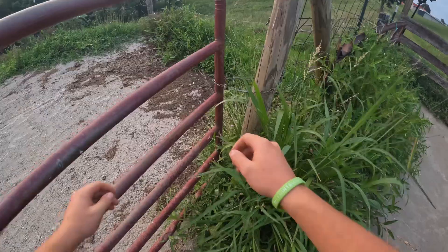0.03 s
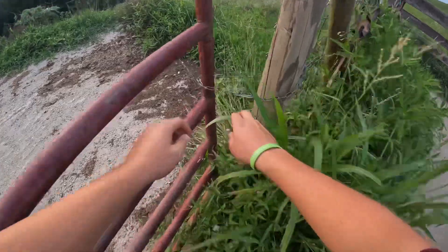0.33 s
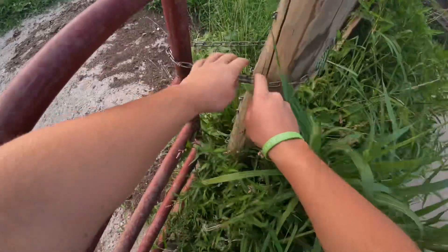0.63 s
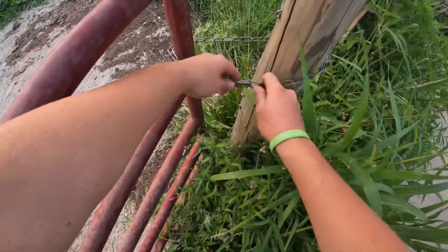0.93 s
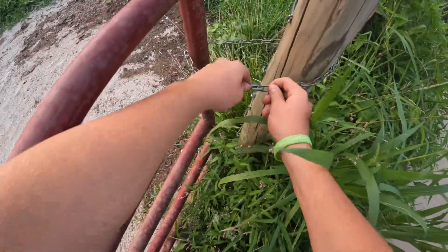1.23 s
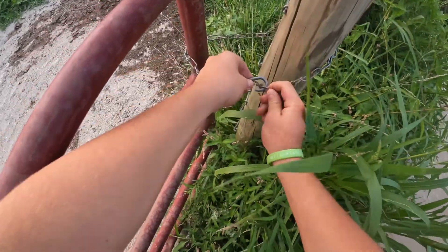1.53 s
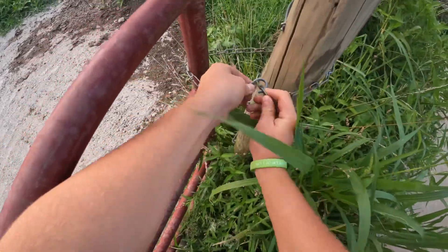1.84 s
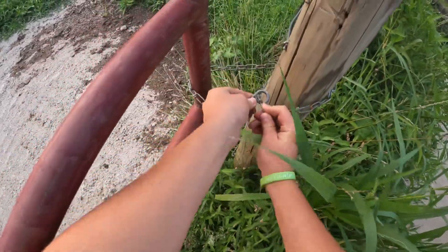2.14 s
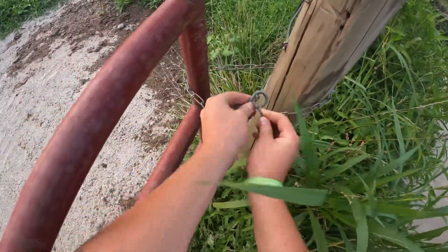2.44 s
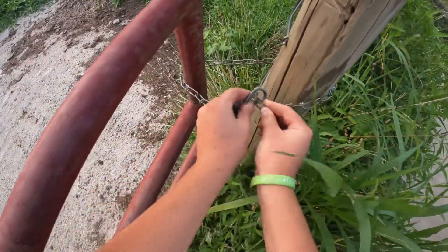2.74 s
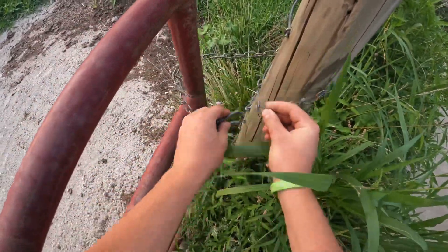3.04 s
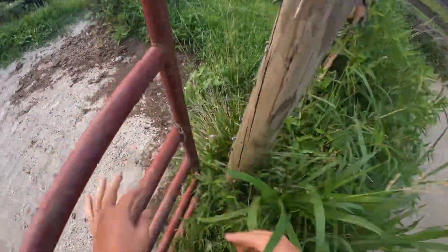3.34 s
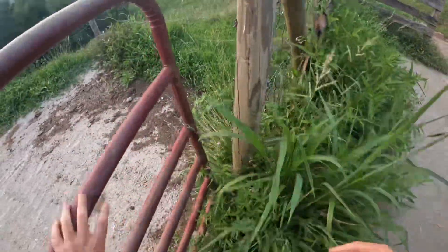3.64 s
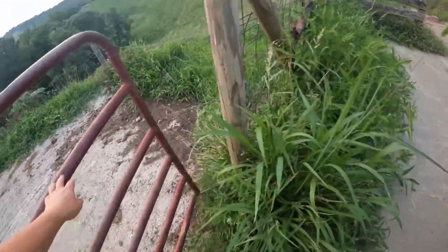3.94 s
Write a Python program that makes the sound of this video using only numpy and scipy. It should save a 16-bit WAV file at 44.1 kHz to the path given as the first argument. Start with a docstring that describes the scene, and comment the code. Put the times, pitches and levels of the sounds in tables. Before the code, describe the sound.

A chain is unhooked and rattles against a steel gate outdoors, while a small engine idles close by throughout with quick thumps and light clatter. Grass rustles softly around 0.4 seconds. A snap latch clacks at 1.3 seconds, followed by faint ticks of links. The chain clatters on the ringing tubes at 3.3 seconds and again at 3.8, when the gate also bumps dully in its hinges.

```python
"""Outdoors, a single-cylinder engine idles close by, about eleven exhaust thumps a second with the
valve gear clattering in step. Early on, arms brush through long grass. At 1.3 s a snap latch clacks,
then links tick in the fingers as a chain is unhooked from a steel tube gate. From 3.3 s the loose chain
drops and rattles against the ringing tubes in two bursts; under the second, the swinging gate bumps
in its hinges."""
import sys
import numpy as np
from scipy import signal
from scipy.fft import rfft, irfft
from scipy.io import wavfile

SR = 44100
rng = np.random.default_rng(int(sys.argv[2]) if len(sys.argv) > 2 else 0)


def inscribe(sig):
    """Save sig as 16-bit PCM at rate SR to the path in sys.argv[1].

    A 1-D sig is mono; a 2-D sig holds one channel per row.
    Samples are clipped to [-1, 1] before scaling.
    """
    pcm = np.round(np.clip(np.atleast_2d(sig).T, -1, 1) * 32767)
    wavfile.write(sys.argv[1], SR, pcm.astype(np.int16))


N = 176400

# The chain strikes the gate. Each row: start in seconds, level in dB, treble tilt in dB per octave,
# rattle decay in seconds, rattle level in dB against the blow.
CHAIN_HITS = [(3.259, -39.5, -1.5, 0.018, 5.5), (3.2763, -21.5, 3.5, 0.021, -5),
              (3.2823, -28, 0.5, 0.013, 0), (3.3027, -21.5, 2.5, 0.026, -0.5),
              (3.3267, -24, -0.5, .025, -27), (3.345, -29, -3, 0.035, -0.5),
              (3.412, -31.5, 14.5, .008, -12), (3.4214, -19.5, -1, 0.0041, -6),
              (3.447, -26, -2.5, 0.014, -3.5), (3.495, -30, -6, 0.017, -5), (3.7622, -43, -6.5, 0.056, 6.5),
              (3.82, -32.5, 2.5, .008, -11), (3.8255, -30, -8.5, 0.0032, -6), (3.8345, -29, 1, 0.017, -2.5),
              (3.8659, -21, .5, 0.024, -11), (3.885, -34, 8, .02, 2), (3.909, -25, -3, 0.043, -3),
              (3.9557, -27.5, 7, 0.01, -10)]
# Tone of the struck gate. Each row: frequency in Hz, relative level in dB.
GATE_TONE = [(210, -1), (350, -20), (481, -5.5), (692, -16), (749, -6.5), (951, -9.5), (1190, -4.5),
             (1460, -5.5), (2170, -2), (2580, -1), (3840, -1), (4790, -5), (6790, -3), (11800, -22),
             (15500, -36)]
# Tail of the tube's crowded modes. Each row: frequency in Hz, time to fall 60 dB (t60) in seconds.
GATE_TAIL = [(500, 0.39), (1400, 1), (2400, 0.52), (4000, 0.47), (7000, 0.19), (10000, 0.22), (14000, 0.2)]
# The tube's clearest modes. Each row: pitch in Hz, relative level in dB, t60 in seconds.
GATE_PARTIALS = [(1216, -9.5, 1.2), (1320, -9.5, 1), (1533, -13, 1), (1716, -8, 0.6), (2083, 1, 0.24),
                 (2400, -22, 0.24), (2970, -18, 0.36), (3014, -9, 0.94), (3500, -23, .3), (3600, -12, .25),
                 (5000, -21, 0.16), (5800, -8, 0.36), (5640, -4, 0.41), (9351, -17.5, .35)]
# The snap latch clacks. Each row: start in seconds, level in dB, treble tilt in dB per octave,
# rattle decay in seconds, rattle level in dB against the blow.
LATCH_HITS = [(1.3255, -43.5, -2, 0.01188, -4), (1.337, -44.5, 3, 0.011, 13.5),
              (1.3483, -25, 0.5, .005, -26), (1.353, -37, 21, 0.011, -6), (1.385, -37, -2, 0.034, -3.5)]
# Tone of the latch. Each row: frequency in Hz, relative level in dB.
LATCH_TONE = [(410, -46), (700, -2), (884, -22), (1120, -8), (1250, -22), (1390, 3), (1600, -5.5),
              (2340, -7), (2530, -9.5), (3320, 2.5), (4830, -19), (7400, -6), (9350, -15.5), (14300, -35),
              (15500, -49)]
# Tail of the latch's crowded modes. Each row: frequency in Hz, t60 in seconds.
LATCH_TAIL = [(1000, 0.23), (3300, 0.39), (5000, 0.26), (7400, .18), (9400, 0.07), (13000, 0.048)]
# The latch's clearest modes. Each row: pitch in Hz, relative level in dB, t60 in seconds.
LATCH_PARTIALS = [(1462, -8.5, 1), (1418, -7, 0.32), (1730, -8, 0.27), (2958.8, -21, 0.27), (3120, 1, 0.49),
                  (4100, -3, .3), (6970, -2, .18), (7612, 0, 0.11), (8940, -15, .2)]
# Single links and the latch ring hang free and ring out.
# Each row: start in seconds, level in dB, pitch in Hz, t60 in seconds.
LINK_CHIMES = [(1.174, -44.5, 4020, 0.23), (1.172, -39, 3080, .15), (1.3483, -36.5, 9380, 0.12),
               (1.352, -40, 3330, 0.56), (3.2777, -31, 9300, 0.12), (3.3268, -20.5, 3855, 0.17),
               (3.4214, -29.5, 5790, 0.42), (3.4217, -34, 3105, 0.9), (3.42, -26, 8160, 0.061),
               (3.4214, -28, 11900, 0.075), (3.7622, -36.5, 2300, 0.12), (3.956, -30.5, 7100, 0.21)]
# Links tick in the fingers. Each row: start in seconds, level in dB, pitch in Hz.
FINGER_TICKS = [(1.62, -65, 10000), (1.992, -59.5, 9500), (2.587, -60, 9800), (2.686, -58, 8500),
                (2.729, -62, 9000), (2.75, -55, 6944), (2.8244, -44, 8800), (2.875, -67, 10500),
                (3.546, -50, 10000), (3.635, -63, 10400)]
# The gate bumps in its hinges. Each row: start in seconds, level in dB.
HINGE_BUMPS = [(3.754, -26), (3.785, -29), (3.824, -32), (3.87, -26.5), (3.954, -28)]
# Idle speed. Each row: time in seconds, firings per second.
IDLE_SPEED = [(0.21, 10.865), (0.48, 11.241), (0.58, 10.59), (0.86, 10.834), (1.12, 11.436), (1.21, 11.373),
              (1.4, 10.547), (1.49, 10.857), (1.58, 10.65), (2.13, 11.257), (2.32, 10.445), (2.68, 11.126),
              (2.78, 10.472), (3.14, 11.32), (3.23, 10.939), (3.42, 10.642), (3.6, 11.422), (3.78, 10.78),
              (3.87, 11.126)]
# Silencer resonances. Each row: pitch in Hz, level in dB, t60 in seconds.
SILENCER_MODES = [(35.4, -8.5, 0.19), (41.03, -2, 0.063), (105.5, -4, 0.061), (135.65, -5, 0.065),
                  (143.6, -13, 0.215), (251.9, -21, 0.086)]
# Exhaust loudness as the listener turns. Each row: time in seconds, gain in dB.
EXHAUST_RIDE = [(.2, 0.5), (.6, 1.5), (1.5, 0.5), (3.2, -0.5), (3.6, -2.5), (4, 0)]
# Valve-gear knocks. Each row: position as a share of the engine cycle, centre in Hz, width in Hz,
# decay in seconds, level in dB.
VALVE_KNOCKS = [(.74, 610, 440, 0.014, -38.5), (0.835, 1800, 160, .02, -42.5),
                (0.26, 1965, 450, 0.028, -49.5), (.82, 2800, 860, 0.0078, -47),
                (0.72, 3270, 320, 0.084, -54), (0.21, 870, 910, .015, -41.5),
                (0.13, 430, 120, 0.023, -46.5), (0.87, 2800, 1400, 0.0018, -62)]
# Tone of the engine's running noise. Each row: frequency in Hz, relative level in dB.
WHIRR_TONE = [(330, -1), (440, -1), (580, 1.5), (950, -7), (1150, -4), (1530, -11), (1800, -7.5),
              (2100, -10), (3300, -14), (4000, -19), (5300, -20), (6400, -26), (7600, -24.5), (9000, -36.5),
              (15000, -57.5)]
# Loudness of that whirr, early and late. Each row: time in seconds, relative level in dB.
WHIRR_RIDE_EARLY = [(0.15, -36.5), (0.202, -39.5), (0.416, -35), (1.15, -40.5)]
WHIRR_RIDE_LATE = [(1.6, -42.5), (2.1, -43), (2.7, -42.5), (3.2, -40.5), (4, -47)]
# Tone of the grass rustle. Each row: frequency in Hz, relative level in dB.
GRASS_TONE = [(700, -1), (1400, 4.5), (3000, -9.5), (6000, -16.5), (10000, -27.5), (15000, -46)]


def undb(db):
    """Decibels to gain."""
    return 10 ** (np.asarray(db) / 20)


def fade(t, t60):
    """A tail that falls 60 dB in t60 seconds."""
    return undb(-60 * t / t60)


def on_log(hz, table):
    """Read a table along a logarithmic frequency axis."""
    points_hz, values = np.array(table, float).T
    return np.interp(np.log(hz + 1e-3), np.log(points_hz), values)


def noise(gain, size=N):
    """Noise of rms 1 whose spectrum follows gain(Hz)."""
    hz = np.arange(size // 2 + 1) * SR / size + 1e-3
    shaped = irfft(rfft(rng.standard_normal(size)) * gain(hz), size)
    return shaped / np.sqrt(np.mean(shaped ** 2))


def peak(hz, width):
    """A resonance with steep skirts."""
    return lambda f: 1 / (1 + ((f - hz * hz / f) / (1.36 * width)) ** 2)


def colour(table):
    """Gain from (Hz, dB) points, rolling off around and below the first."""
    return lambda f: undb(on_log(f, table)) / np.sqrt(1 + (table[0][0] / f) ** 8)


def add(out, start_s, x):
    """Mix a sound in at a moment."""
    i = int(start_s * SR)
    out[i:i + len(x)] += x[:max(len(out) - i, 0)]


def struck_steel(hits, tone, tail, partials, ring_db, crack_db, jingle_db=-1, crack_s=0.00089):
    """Each blow, and each bounce after it, sets off a crack, crowded modes, clear modes and a jingle."""
    size = 32768
    t, f = np.arange(size) / SR, np.arange(size // 2 + 1) * SR / size
    edges_hz = np.geomspace(200, 17000, 17)
    bands = [((f >= lo) & (f < hi), fade(t, on_log(np.sqrt(lo * hi), tail)))
             for lo, hi in zip(edges_hz, edges_hz[1:])]
    mode_hz = np.array(partials)[:, 0]
    mode_fades = np.array([undb(db + ring_db) * fade(t, t60) for _, db, t60 in partials])
    out = np.zeros(N)
    for start, db, tilt_db, rattle_s, rattle_db in hits:
        tilt = lambda hz: undb(tilt_db * np.log2(np.maximum(hz, 500) / 3500))
        gain = lambda hz: colour(tone)(hz) * tilt(hz)
        spectrum = rfft(noise(gain, size))
        crowd = sum(irfft(spectrum * band) * envelope for band, envelope in bands)
        # the chain's weight detunes the clear modes
        loaded_hz = mode_hz * (1 + .012 * rng.standard_normal(len(partials)))
        mode_gain = rng.choice([-1, 1], len(partials)) * tilt(mode_hz)
        ring = mode_gain @ (mode_fades * np.sin(2 * np.pi * loaded_hz[:, None] * t))
        body = (crowd + ring + undb(jingle_db) * jingle(t, gain)) / np.hypot(1, undb(jingle_db))
        crack = undb(crack_db) * noise(gain, size) * np.exp(-t / crack_s)
        impacts = rattle(t, rattle_s, rattle_db)
        add(out, start, undb(db) * signal.fftconvolve(body + crack, impacts)[:size])
    return out


def jingle(t, gain, links=16, range_hz=(2195, 12720)):
    """A blow rings several links, each at its own pitch; the high ones die first."""
    hz = np.exp(rng.uniform(*np.log(range_hz), size=links))
    strength = gain(hz) * np.sqrt(hz) * rng.standard_normal(links)
    t60 = 0.075 * np.sqrt(5000 / hz[:, None])
    rings = np.sin(2 * np.pi * hz[:, None] * t) * fade(t, t60)
    return strength @ rings * np.sqrt(2 / np.sum(strength ** 2))


def rattle(t, decay_s, db, bounces_per_s=260):
    """One full blow, then a dying scatter of link bounces."""
    contacts = rng.random(len(t)) < bounces_per_s / SR
    bounces = contacts * rng.standard_normal(len(t)) * np.exp(-t / decay_s)
    impacts = undb(db) * bounces / np.sqrt(np.sum(bounces ** 2) + 1e-6)
    impacts[0] = 1
    return impacts


def free_links(split_hz=52):
    """A bent link shimmers with four close modes that beat."""
    t, out = np.arange(SR // 2) / SR, np.zeros(N)
    for start, db, hz, t60 in LINK_CHIMES:
        cluster_hz = hz + split_hz * (np.linspace(-2, 2, 4) + rng.uniform(-.5, .5, 4))
        ring = rng.choice([-.5, .5], 4) @ np.sin(2 * np.pi * cluster_hz[:, None] * t)
        add(out, start, undb(db) * ring * fade(t, t60))
    return out


def finger_ticks(width_hz=910, decay_s=0.0033):
    """Small links touch, choked at once by the fingers."""
    t, out = np.arange(SR // 10) / SR, np.zeros(N)
    for start, db, hz in FINGER_TICKS:
        ping = noise(peak(hz, width_hz), len(t))
        overtone = undb(-8) * noise(peak(hz * 1.35, width_hz), len(t))
        body = undb(6) * noise(peak(hz=5500, width=2000), len(t))
        add(out, start, undb(db) * (ping + overtone + body) * np.exp(-t / decay_s))
    return out


def gate_bumps(attack_s=0.0025, decay_s=0.043):
    """The heavy frame knocks dully in its hinges."""
    t, out = np.arange(SR // 3) / SR, np.zeros(N)
    envelope = np.exp(-t / decay_s) * (1 - np.exp(-t / attack_s))
    for start, db in HINGE_BUMPS:
        add(out, start, undb(db) * noise(peak(hz=110, width=65), len(t)) * envelope)
    return out


def engine(first_firing_s=.075):
    """A single cylinder hunts slightly around its idle speed, driving exhaust, whirr and valve gear."""
    t = np.arange(N) / SR
    cycle = np.cumsum(np.interp(t, *np.array(IDLE_SPEED).T)) / SR
    cycle -= np.interp(first_firing_s, t, cycle)
    firings = np.interp(np.arange(int(cycle[-1]) + 1), cycle, t)
    return exhaust(firings) + whirr(t, cycle) + valve_gear(cycle)


def exhaust(firings, puff_s=.0037, scatter_db=0.98):
    """Each firing sends a soft puff of gas through the silencer, over a steady rumble."""
    t, out = np.arange(SR // 3) / SR, np.zeros(N)
    ring = sum((-1) ** k * undb(db) * fade(t, t60) * np.sin(2 * np.pi * hz * t)
               for k, (hz, db, t60) in enumerate(SILENCER_MODES))
    puff = np.sin(np.pi * np.minimum(t[:SR // 50] / puff_s, 1)) ** 2
    thump = signal.fftconvolve(ring, puff / puff.sum())
    for start in firings:
        level_db = np.interp(start, *np.array(EXHAUST_RIDE).T) + scatter_db * rng.standard_normal()
        add(out, start, thump * undb(level_db))
    rumble = undb(-39.5) * noise(peak(hz=84, width=116))
    return out + rumble


def valve_gear(cycle, attack_s=0.0019, scatter_db=2):
    """The valve gear knocks at set points of every cycle, never twice with quite the same force."""
    cycles_per_s, out = np.gradient(cycle) * SR, np.zeros(N)
    for share, hz, width, decay_s, db in VALVE_KNOCKS:
        turn, phase = np.divmod(cycle - share + 2, 1)
        age_s = phase / cycles_per_s
        strength = undb(db + scatter_db * rng.standard_normal(64))[turn.astype(int)]
        envelope = np.exp(-age_s / decay_s) * (1 - np.exp(-age_s / attack_s))
        out += strength * envelope * noise(peak(hz, width))
    return out


def whirr(t, cycle, trim_db=-3, swing_db=1):
    """The engine's running noise swells once a cycle, with a narrow, steady hiss on top."""
    ride_db = np.interp(t, *np.vstack([WHIRR_RIDE_EARLY, WHIRR_RIDE_LATE]).T) + trim_db
    swell_db = swing_db * np.cos(2 * np.pi * (cycle - 0.025))
    running = noise(colour(WHIRR_TONE)) * undb(ride_db + swell_db)
    hiss = undb(-67.5) * noise(peak(hz=7170, width=250))
    return running + hiss


def grass(centre_s=0.4, spread_s=0.1):
    """Arms brush through long grass: one soft rustle that swells and fades."""
    t = np.arange(N) / SR
    swell = np.exp(-((t - centre_s) / spread_s) ** 2 / 2)
    return undb(-43.5) * noise(colour(GRASS_TONE)) * swell


def air():
    """A thin, very faint hiss, separate in each ear."""
    band = peak(hz=12100, width=2500)
    return undb(-85.5) * np.array([noise(lambda f: band(f) ** 2) for _ in range(2)])


def scene(pan_db=0.8, side_delay_s=.005, side_copy_db=-25):
    """The metal sits a touch left, widened by a faint, slightly delayed copy of opposite sign in each ear; the
    engine holds the centre."""
    chain = struck_steel(CHAIN_HITS, GATE_TONE, GATE_TAIL, GATE_PARTIALS, ring_db=-9.5, crack_db=1.5)
    links = finger_ticks() + free_links()
    latch = struck_steel(LATCH_HITS, LATCH_TONE, LATCH_TAIL, LATCH_PARTIALS, ring_db=-14.5, crack_db=-7.5)
    metal = chain + links + latch
    sides, side_copy = np.array([[1], [-1]]), np.zeros(N)
    add(side_copy, side_delay_s, undb(side_copy_db) * metal)
    stereo_metal = metal * undb(sides * pan_db / 2) + sides * side_copy
    return stereo_metal + air() + engine() + grass() + gate_bumps()


def record(dry, fade_in_s=(0.076, 0.18), top_hz=15500):
    """A quick fade-in and a steep cut of the very top."""
    fade_in = np.interp(np.arange(N) / SR, fade_in_s, (0, 1))
    low_pass = signal.ellip(10, .2, 80, top_hz, fs=SR, output="sos")
    return signal.sosfilt(low_pass, dry * fade_in)


dry = scene()
out = record(dry)
inscribe(out)
```